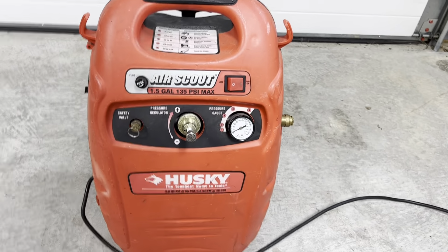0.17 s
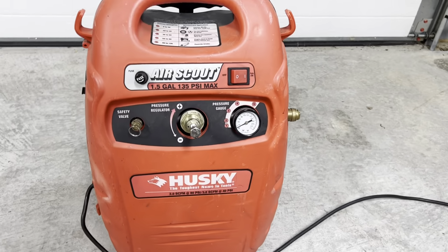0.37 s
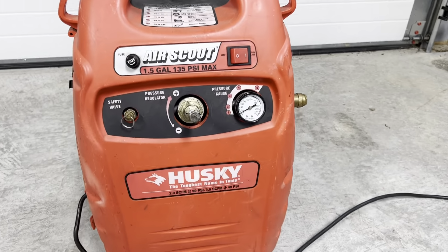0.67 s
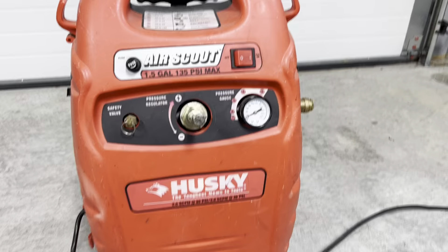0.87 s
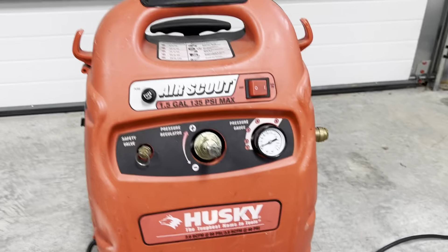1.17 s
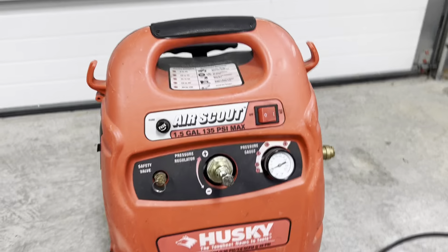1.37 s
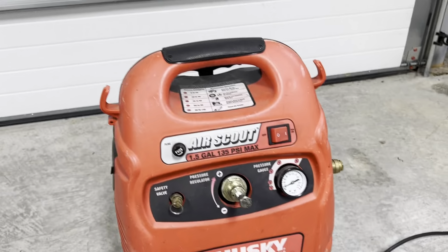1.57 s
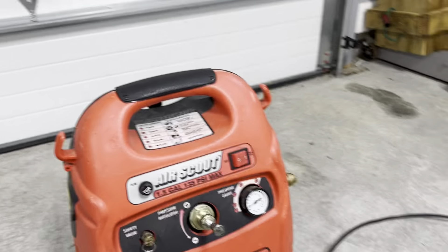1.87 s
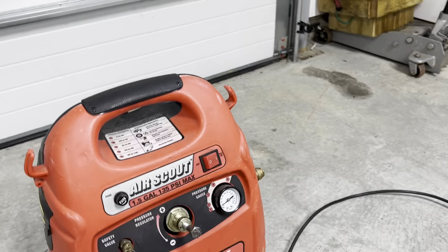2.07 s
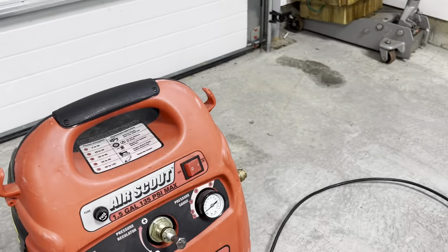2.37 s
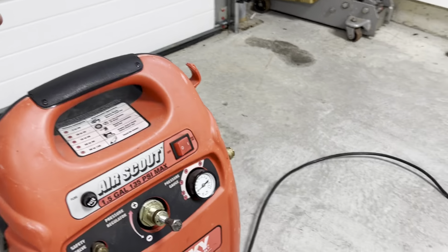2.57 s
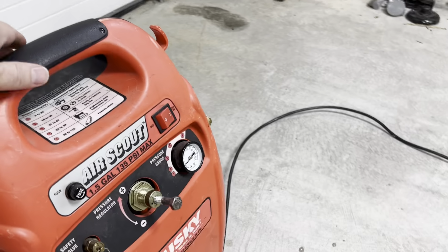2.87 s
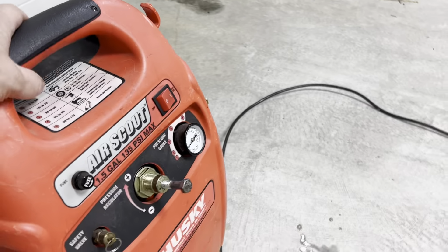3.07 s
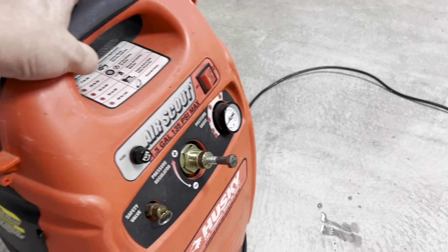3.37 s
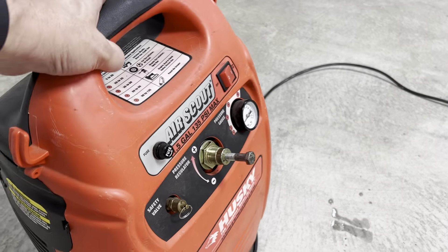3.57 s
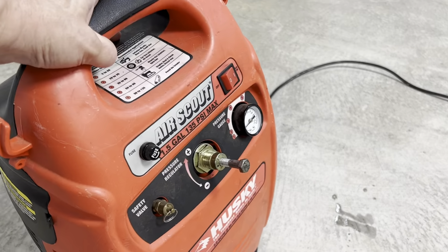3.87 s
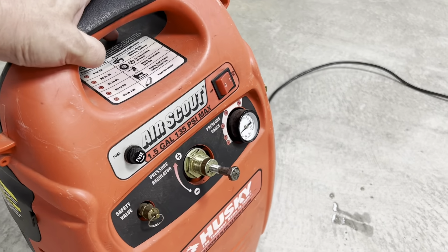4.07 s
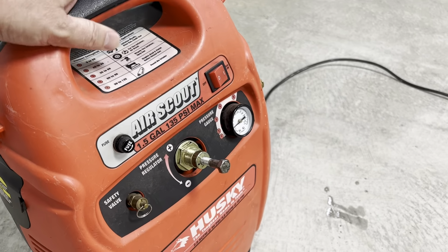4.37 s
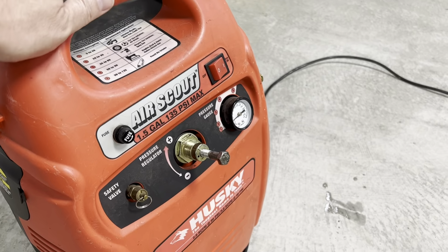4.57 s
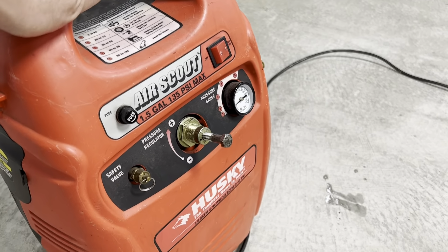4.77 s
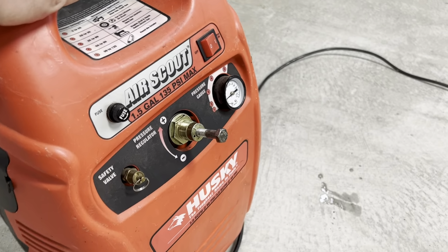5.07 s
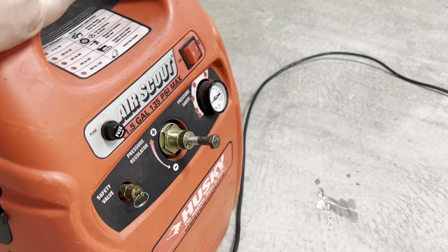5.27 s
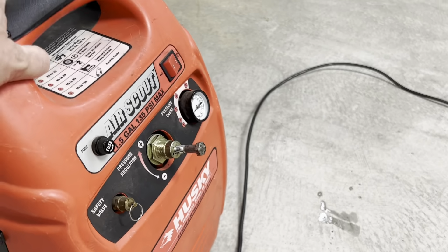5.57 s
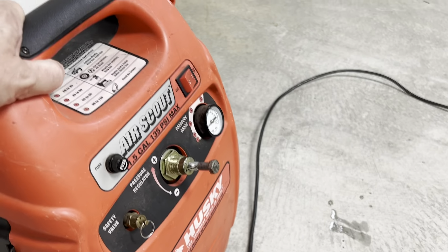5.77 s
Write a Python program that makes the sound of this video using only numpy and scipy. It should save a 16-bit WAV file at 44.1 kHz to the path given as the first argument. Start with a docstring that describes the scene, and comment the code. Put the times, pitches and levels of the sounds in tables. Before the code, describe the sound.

A small piston air compressor runs steadily in a garage, a rapid hammering drone with rattle and hiss, slowly dropping in pitch.

```python
"""A small piston air compressor fills its tank in a garage; the crank slows as the pressure climbs.
Piston and valves sound as sines at multiples of the crank rate, lifted where they cross body resonances.
Motor and gear whine are further sines; rattle and hiss are shaped noise pulsed by the valve knock.
A mains hum holds its pitch. A hand-held stereo microphone moves from the front round to the side."""
import sys
import numpy as np
from scipy import signal
from scipy.io import wavfile
from scipy.ndimage import uniform_filter1d

SR = 44100
rng = np.random.default_rng(int(sys.argv[2]) if len(sys.argv) > 2 else 0)


def put_to_file(sound):
    """Save the sound as 16-bit audio at rate SR, in the file named by the first command-line argument."""
    columns = np.atleast_2d(sound).T  # one column per channel
    safe = np.clip(columns, -1, 1)
    whole_steps = np.round(safe * 32767)
    wavfile.write(sys.argv[1], SR, whole_steps.astype(np.int16))


N = 261513
T = np.arange(N) / SR
SLOW_T = T[::256]  # time grid of the slow controls
EDGE_HZ = 15720  # upper band limit

# Crank speed. Each row: time in seconds, crank turns per second.
CRANK = [(0.0, 37.34), (0.49, 37.172), (0.99, 36.8), (1.48, 36.39), (1.98, 35.891), (2.47, 35.52),
         (2.96, 35.173), (3.46, 34.784), (3.95, 34.493), (4.45, 34.184), (4.94, 33.918), (5.44, 33.772),
         (5.93, 33.496)]
# Microphone path. Each row: time in seconds, place (0 in front, 1 above the corner, 2 at the side).
PLACE = [(0, 0.17), (.7, 0.0065), (1.2, 0.26), (1.6, 0.56), (1.9, 0.67), (2.8, 1.13), (3.2, 1.23),
         (4.4, 1.25), (4.9, 1.87), (5.93, 1.9)]
# Tank and housing resonances. Each row: centre in Hz, width in Hz, lift in dB (the rattle takes a share).
BODY = [(184, 5, 3), (265, 5, 14), (285, 5, 13), (347, 12, 22), (413, 10, 10), (439, 6, 16), (494, 19, 11),
        (556, 6, 5), (620, 39, 13), (692, 23, 19), (759, 6, 20), (851, 20, 17), (926, 11, 21),
        (948, 18, 22), (1021, 18, 21), (1090, 6, 11), (1342, 21, 9), (1362, 6, 12), (1415, 8, 11),
        (1455, 6, 9), (1494, 21, 9), (1535, 29, 9), (1596, 6, 11), (1672, 9, 21)]
# Standing waves in the garage, lifting or sinking single tones as the microphone moves.
# Each row: multiple of the crank rate, time in seconds, half length in seconds, lift in dB.
STANDING = [(3.5, 2.0, 0.8, -9), (4.5, 0.8, 0.2, 5), (4.5, 4.8, 0.4, 4), (5, 0.8, 0.3, 3), (6, 3.2, 0.2, 9),
            (6, 4.4, 0.35, -9), (7, 0.8, 0.35, 5), (7, 1.9, 0.55, -5), (7, 3.4, 0.8, 5),
            (7.5, 2.0, 0.8, -14), (8, 0.8, 0.8, 3), (8, 2.7, 0.3, 5), (8, 4.3, 0.4, 9), (9, 0.3, 0.3, 4),
            (9, 2.5, 0.35, 9), (10, 2.8, 0.25, 4), (12, 0.3, 0.3, -5), (15, 1.7, 0.45, -6),
            (15, 3.7, 0.3, 4), (15, 4.6, 0.35, -9), (17, 4.3, 0.3, 4), (18, 0.9, 0.35, 5),
            (18, 3.9, 0.2, -9), (18, 4.8, 0.3, 3), (21, 0.7, 0.9, 8), (23, 0.5, 0.7, 3), (34, 4.8, 0.9, 5),
            (20, 1.5, 0.3, -6), (20, 2.1, 0.3, 5), (22, 1.1, 0.45, 8), (22, 1.9, 0.55, 14),
            (22, 3.6, 0.5, 6), (23, 2.1, 0.3, -12), (26, 4.2, 0.65, -12), (29, 0.9, 1.2, -5),
            (36, 5.2, 0.4, -8), (37, 5.2, 0.4, -8), (39, 5.2, 0.3, -8), (42, 2.5, 0.5, -6),
            (42, 3.9, 0.3, -9), (43, 4.3, 0.5, 7), (45, 3.9, 0.3, 7), (24, 1.1, 0.35, 9),
            (25, 2.3, 0.3, -9), (26, 2.3, 0.4, 5), (27, 4.7, 0.3, -5), (29, 2.8, 0.4, 2),
            (28, 1.3, 0.2, -5), (28, 2.3, 0.3, -9), (28, 3.3, 0.8, -14), (28, 4.2, 0.2, -5),
            (29, 3.6, 0.2, -14), (29, 4.8, 0.55, 5), (30, 1.9, 0.2, 14), (37, 1.5, 0.55, -5),
            (37, 2.4, 0.2, 9), (38, 2.4, 0.8, -9), (39, 0.9, 0.35, -14), (39, 3.2, 0.35, -9),
            (39, 4.1, 0.2, 9), (40, 0.7, 0.35, -5), (40, 1.7, 0.2, 9), (40, 5.2, 0.35, -14),
            (41, 1.6, 0.4, 3), (45, 2.6, 0.2, 9), (54.0, 2.4, 0.35, -14), (54, 4.8, 0.2, 9),
            (54.0, 5.3, 0.3, 5), (57.38, 0.2, 0.2, -14), (57.38, 0.6, 0.3, 5), (57.38, 2.1, 0.4, -9),
            (57.38, 2.8, 0.2, 9), (57.38, 4.2, 0.7, -20)]

# Mains hum of the motor windings: level in dB rms in front, above, at the side.
HUM_HZ = 120
HUM_DB = (-37, -42.5, -45)

# Fan and valve hiss, common to both ports. Each row: frequency in Hz, base level in dB per Hz.
HISS = [(1500, -91.5), (2200, -73), (2450, -76.5), (2700, -74.5), (3300, -78), (4500, -75.5), (6000, -81),
        (7500, -78), (9000, -82.5), (9600, -112), (10600, -112), (11000, -85.5), (13000, -80),
        (15700, -87.5)]
# Hiss of opposite sign in the two ports. Each row: frequency in Hz, base level in dB per Hz.
HISS_WIDE = [(1500, -90), (2200, -70.5), (2450, -87), (2700, -75.5), (3700, -77), (4300, -77.5),
             (7000, -84), (9000, -81.5), (11000, -84.5), (12200, -79.5), (12600, -108), (14300, -108),
             (14600, -95), (15700, -92)]
# Brush noise humps. Each row: multiple of the motor rate, width in Hz, lift in dB.
BRUSHES = [(32.14, 540, 4), (64.7, 420, 1.5), (94.8, 420, 6)]
# Small metal parts ringing in the hiss. Each row: centre in Hz, width in Hz, full lift in dB.
PARTS = [(1998, 9, 15.5), (2210, 29, 4), (2650, 34, 8), (2970, 18, 9), (3203, 34, 9), (4930, 51, 8),
         (5320, 60, 3), (5780, 62, 3)]
# A single swell of the treble: time in seconds, half length in seconds, centre in Hz, width in Hz, lift in dB.
SWISH = (1.82, 0.14, 5600, 1600, 4)

# Rattle common to both ports. Each row: frequency in Hz, base level in dB per Hz.
RATTLE = [(20, -78), (50, -57), (100, -61), (140, -59), (160, -48.5), (190, -41), (290, -59), (350, -55.5),
          (500, -57.5), (750, -56.5), (900, -62), (1020, -56.5), (1180, -65.5), (1370, -59.5), (1700, -60),
          (1950, -69), (2400, -117.5)]
# Rattle of opposite sign in the two ports. Each row: frequency in Hz, base level in dB per Hz.
RATTLE_WIDE = [(20, -95), (100, -75), (170, -97), (350, -57), (800, -58), (900, -58), (1030, -58.5),
               (1180, -61), (1370, -52), (1450, -62), (1650, -53), (1900, -64), (2400, -87)]
# Brief panel buzzes. Each row: time in seconds, half length in seconds, centre in Hz, width in Hz, lift in dB.
BUZZES = [(2.5, 0.11, 1590, 140, 6), (2.71, .04, 1590, 100, 10), (3.42, .05, 1520, 80, 2),
          (3.62, 0.028, 1530, 100, 11), (3.72, 0.023, 1510, 140, 14), (3.872, 0.041, 1520, 140, 9)]

# Noise gained in front of the machine. Each row: frequency in Hz, lift in dB.
FRONT = [(60, 5), (130, 6.5), (350, 5.5), (600, 2), (950, 6.5), (1500, 6.5), (2500, 2), (4000, 3),
         (8000, 4), (12000, 3.5)]
# Part of the noise difference that is the common noise turned a quarter cycle.
# Each row: frequency in Hz, amplitude share (0 to 1).
QUADRATURE = [(200, 0.2), (700, 0.8), (1500, 0), (3000, 0.2), (6000, .35), (9000, 1), (12000, .7)]
# Left and right balance of the noise. Each row: frequency in Hz, left minus right in dB.
LEAN = [(60, -0.5), (130, -4), (290, 7), (640, 1.5), (1410, -1), (3100, 3.5), (6820, 1.5), (15000, -.5)]
# Port difference of the tones. Each row: frequency in Hz, level against the common part in dB.
TONE_WIDE = [(60, -55), (130, -26.5), (290, -11.5), (640, -13.5), (1410, -10), (3100, -12), (6820, -7),
             (15000, 0)]
TONE_LEAN_DB = -1.1  # left minus right

# Gear mesh whine and its side tones: multiples of the crank rate.
GEAR_MULTIPLES = [103.5, 105, 106, 107, 108, 109, 110, 112.5, 211.5]
# Each row: level in dB rms in front, above, at the side, before the lifts of body and room.
GEAR_DB = [(-52.5, -60, -63), (-69, -55, -51), (-61, -65, -76), (-63, -70, -65), (-53.5, -62, -60),
           (-51, -79, -64), (-55, -69, -61), (-52, -55, -61), (-49, -55, -68)]
MOTOR_TURNS = 27 / 8  # motor turns per crank turn
# Motor tones. Each row: multiple of the motor rate, then level in dB rms in front, above, at the side,
# before the lifts of body and room.
WHINE = [(4, -55, -52, -51), (15, -68, -58, -63), (16, -49, -56, -56), (17, -51, -54, -68)]

# Blows within each turn, bass to treble: air thump, valve closing, valve knock, its upper ring.
# Each row: highest multiple, crank angle in turns, start of its swing in cycles, base echo smear in cycles.
BLOWS = [(9, 0, .05, .01), (21, .9, .55, .09), (30, .3, .9, .05), (99, .285, .62, .13)]
# The same for the half multiples: crank angle in turns, start of the swing in cycles.
ROCKING = (-.45, .27)
KNOCK_TURN = BLOWS[2][1]  # crank angle of the valve knock

# Valve blow spectrum. Each row: frequency in Hz, then level in dB rms in front, above, at the side,
# before the lifts of single multiples, body and room.
VALVES = [(299, -45.5, -61, -47.5), (416, -43, -45.5, -45), (482, -59, -46, -50.5), (611, -43, -49, -48.5),
          (680, -66.5, -57.5, -48), (810, -62, -59, -58.5), (958, -45.5, -57.5, -62.5),
          (1156, -54.5, -57, -61), (1350, -48.5, -53, -49.5), (1550, -47.5, -55.5, -64),
          (1690, -79, -66, -60)]
FIRST_UPPER, LAST_UPPER = 9, 46  # multiples made by the valves
# Lift by the shape of the blow. Each entry: multiple, lift against its neighbours in dB.
ODD_MULTIPLES = {13: -10, 15: 5, 16: -5, 21: -8, 22: -3, 26: 2, 29: 3, 30: -4, 31: -4, 32: 4, 37: 3, 46: -7}
# Knocks stronger or weaker than usual. Each row: time in seconds, strength in dB on the scale of USUAL_KNOCK_DB.
HARD_KNOCKS = [(0.167, -9.5), (0.328, -11.5), (0.488, -11.5), (0.569, -9), (0.596, -10), (0.623, -9),
               (0.732, -12), (0.786, -11), (0.92, -15), (0.947, -8), (0.975, -10), (1.002, -8),
               (1.029, -9.5), (1.056, -8), (1.165, -10.5), (1.549, -8.5), (1.687, -7), (1.715, -7)]
USUAL_KNOCK_DB, KNOCK_SPREAD_DB = -11, 0.9
KNOCK_PEAK_S, KNOCK_HALF_S = 0.0044, 0.007  # lag of the peak, half length

# Piston multiples of the crank rate; half multiples arise as the machine rocks every second turn.
LOW_MULTIPLES = [1, 2, 3, 3.5, 4, 4.5, 5, 5.5, 6, 6.5, 7, 7.5, 8, 22.5]
# Each row: level in dB rms in front, above, at the side, before the lifts of body and room.
LOW_DB = [(-46.5, -42.5, -41.5), (-32.5, -34, -33), (-39, -36, -33), (-38, -52, -71), (-23.5, -36, -35),
          (-33.5, -31.5, -31.5), (-27.5, -24, -26), (-37, -38.5, -38), (-39.5, -38, -63), (-88, -41, -36),
          (-43.5, -40.5, -37), (-47, -47, -69), (-46, -56, -44), (-54, -49, -59)]


def gain_of(db):
    """Amplitude ratio: twenty decibels make a factor of ten."""
    return 10 ** (np.asarray(db) / 20)


def read(points, hz):
    """Spectral interpolation along a logarithmic frequency axis."""
    f, value = np.transpose(points)
    return np.interp(np.log(hz + 1), np.log(f + 1), value)


def curve(rows, t):
    """Linear interpolation of a quantity given at a few moments."""
    return np.interp(t, *np.transpose(rows))


def crank_rate(t):
    """Shaft speed in turns per second, falling under the rising load."""
    return curve(CRANK, t)


def crank_turns():
    """Shaft angle in turns: the time integral of the crank rate."""
    return np.cumsum(crank_rate(T)) / SR


def at_place(front, above, side, t):
    """Directivity: three values blend as the microphone moves from place to place."""
    place = np.clip(curve(PLACE, t), 0, 2)
    in_front = np.maximum(1 - place, 0)
    at_side = np.maximum(place - 1, 0)
    return front * in_front + above * (1 - abs(place - 1)) + side * at_side


def humps_db(hz, peaks):
    """Resonance: each peak adds a bell-shaped power response to a flat one."""
    power = 1
    for centre_hz, width_hz, lift_db in peaks:
        power = power + gain_of(2 * lift_db) / (1 + (2 * (hz - centre_hz) / width_hz) ** 2)
    return 10 * np.log10(power)


def standing_db(multiple, t):
    """Standing waves: single tones rise or sink for a while."""
    lift_db = 0
    for k, s, half_s, db in STANDING:
        chosen = abs(multiple[:, None] - k) < .1
        lift_db = lift_db + chosen * db * np.exp(-((t - s) / half_s) ** 2)
    return lift_db


def swell_db(hz, t, s, half_s, centre_hz, width_hz, db):
    """Transient resonance: a lift confined to one moment and one pitch region."""
    return db * np.exp(-((t - s) / half_s) ** 4 - (2 * (hz - centre_hz) / width_hz) ** 2)


def drift(count, top_hz):
    """Random fluctuation of rms 1: slow sines at chance rates and phases add up."""
    hz = np.geomspace(.15, top_hz, 12)[:, None, None]
    rate = hz * rng.uniform(0.808, 1.2, (count, 1))
    waves = np.sin(2 * np.pi * (rate * SLOW_T + rng.random((12, count, 1))))
    return waves.sum(0) / np.sqrt(6)


def knocks(depth, decay_turns, uneven_db):
    """Periodic excitation: a gain, near rms 1, jumps at each uneven valve knock and dies away."""
    turns = crank_turns() + 1 - KNOCK_TURN + 0.12
    strength = gain_of(uneven_db * rng.standard_normal(300))[turns.astype(int)]
    gain = 1 + depth * strength * np.exp(-(turns % 1) / decay_turns)
    gain = uniform_filter1d(gain, 60)  # soften the jump
    return gain / np.sqrt(uniform_filter1d(gain ** 2, size=SR // 4))


def knock_force():
    """Impact strength: a gain that differs from turn to turn, with marked single knocks."""
    turns = crank_turns() + .5 - KNOCK_TURN
    chance = rng.standard_normal(300)[turns.astype(int)]
    force_db = KNOCK_SPREAD_DB * uniform_filter1d(chance, size=300)
    for s, db in HARD_KNOCKS:
        bump = np.exp(-((T - s - KNOCK_PEAK_S) / KNOCK_HALF_S) ** 2)
        force_db = force_db + (db - USUAL_KNOCK_DB) * bump
    return gain_of(force_db)


def gain_above(x, edge_hz, gain):
    """Band splitting: the gain acts only on the part above the edge."""
    low = signal.oaconvolve(x, signal.firwin(801, edge_hz, fs=SR)[None], "same")
    return low + (x - low) * gain


def noise(common, wide, lift_db, patchy_db):
    """Filtered noise: random short-time spectra, summed and differenced into two ports."""
    hz = np.fft.rfftfreq(2048, 1 / SR)[:, None]
    frames = N // 512 + 5
    t = np.arange(frames) * 512 / SR
    a, b, c, d, patches = rng.standard_normal((5, len(hz), frames))
    # smooth over pitch and time, then restore the spread
    patches = uniform_filter1d(uniform_filter1d(patches, 12, 0), 8, 1) * np.sqrt(96)
    front = 1 - np.clip(curve(PLACE, t), 0, 1)
    shape = gain_of(read(FRONT, hz) * front + lift_db(hz, t) + patchy_db * patches)
    shared, separate = a + 1j * b, c + 1j * d
    turned = np.clip(read(QUADRATURE, hz), 0, 1)
    mid = gain_of(read(common, hz)) * shared
    side = gain_of(read(wide, hz)) * (turned * 1j * shared + np.sqrt(1 - turned ** 2) * separate)
    lean = gain_of(read(LEAN, hz) / 2)
    z = np.array([(mid + side) * lean, (mid - side) / lean]) * shape * np.sqrt(SR / 2048)
    return signal.istft(z, nperseg=2048, noverlap=1536)[1][:, :N]


def tones(multiple, place_db, start_turns, waver_db, waver_turns):
    """Harmonic synthesis: sines locked to the crank rise as they cross the body resonances."""
    t, count = SLOW_T, len(multiple)
    hz = multiple[:, None] * crank_rate(t)
    unrest = np.minimum(hz / 500, 1)  # the lowest multiples are the steadiest
    level_db = at_place(*place_db(hz), t) + humps_db(hz, BODY) + standing_db(multiple, t)
    level_db = level_db + waver_db * unrest * drift(count, 3.)
    phase_turns = start_turns + waver_turns * unrest * drift(count, 3.)
    common = gain_of(level_db) * np.exp(2j * np.pi * phase_turns)
    # the port difference keeps about a quarter cycle from the common part
    wide_turns = 0.26 + 0.1 * (rng.random((count, 1)) - .5) + 0.12 * drift(count, 0.96)
    wide = common * gain_of(read(TONE_WIDE, hz)) * np.exp(2j * np.pi * wide_turns)
    half_t, turns = T[::2], crank_turns()[::2]  # built at half rate
    out = np.zeros((2, len(half_t)))
    for k in range(count):
        spin = np.exp(2j * np.pi * multiple[k] * turns)
        for port, sign in enumerate((1, -1)):
            out[port] += (spin * np.interp(half_t, t, common[k] + sign * wide[k])).real
    out = signal.resample_poly(out, 2, 1, axis=1)[:, :N]
    return np.sqrt(2) * out * gain_of([[TONE_LEAN_DB / 2], [-TONE_LEAN_DB / 2]])


def stroke(multiple, place_db):
    """Phase alignment: groups of multiples line up at their crank angles into a thump and a knock."""
    highest, angle, start, spread = np.transpose(BLOWS)
    group = np.searchsorted(highest, multiple)
    half = multiple % 1 > 0
    whole_cycles = start[group] - multiple * angle[group]
    cycles = np.where(half, ROCKING[1] - multiple * ROCKING[0], whole_cycles)
    cycles = cycles - .25 * (multiple == 5)  # on the main tank resonance the swing lags a quarter cycle
    # the swing of multiples 4.5 and 5 comes earlier as the microphone nears the side
    early_pair = ((multiple == 4.5) | (multiple == 5))[:, None]
    advance = early_pair * at_place(0, .07, .14, SLOW_T)
    scatter = spread[group] * rng.standard_normal(len(multiple))
    smear = at_place(.7, 1.6, 2.2, SLOW_T)  # more echo at the side
    start_turns = cycles[:, None] + advance + scatter[:, None] * smear
    return tones(multiple, place_db, start_turns, waver_db=.8 + 1.5 * half[:, None], waver_turns=.04)


def hum():
    """Magnetic hum: the windings sound at twice the mains rate, whatever the crank speed."""
    level = np.sqrt(2) * gain_of(at_place(*HUM_DB, T))
    return level * np.sin(2 * np.pi * HUM_HZ * T) * np.ones((2, 1))


def hiss():
    """Turbulence noise: fixed rings of small parts and brush humps that fall with the motor rate."""
    def lift_db(hz, t):
        """Resonance lifts over the plain hiss."""
        motor_rate = MOTOR_TURNS * crank_rate(t)
        brushes = [(k * motor_rate, width_hz, db) for k, width_hz, db in BRUSHES]
        parts_db = humps_db(hz, PARTS) * at_place(0.78, 0.82, 0.78, t)  # share of the full lift
        return humps_db(hz, brushes) + parts_db + swell_db(hz, t, *SWISH)
    # the air stream is not quite even
    flutter = gain_of(0.35 * np.interp(T, SLOW_T, drift(1, 9.)[0]))
    air = noise(HISS, HISS_WIDE, lift_db, patchy_db=1.0)
    return air * knocks(depth=0.092, decay_turns=0.46, uneven_db=8.0) * flutter


def rattle():
    """Forced vibration: panel and air-pulse noise, faintly body-coloured, its upper part shaken by knocks."""
    def lift_db(hz, t):
        """A share of the body lift, an overall cut and the brief buzzes."""
        return 0.39 * humps_db(hz, BODY) - 6.0 + sum(swell_db(hz, t, *row) for row in BUZZES)
    panels = noise(RATTLE, RATTLE_WIDE, lift_db, patchy_db=2.0)
    depth = at_place(0.73, 0.43, 0.23, T)
    return gain_above(panels, 700, knocks(depth, decay_turns=0.15, uneven_db=1.5))


def gears():
    """Tooth meshing: a cluster of thin tones at high multiples of the crank rate."""
    levels = np.transpose(GEAR_DB)[:, :, None]
    start_turns = rng.random((len(GEAR_DB), 1))
    return tones(np.array(GEAR_MULTIPLES), lambda hz: levels, start_turns, waver_db=2.5, waver_turns=.15)


def motor():
    """Rotational tones: thin sines at multiples of the motor shaft rate."""
    rows = np.transpose(WHINE)
    start_turns = rng.random((len(WHINE), 1))
    return tones(MOTOR_TURNS * rows[0], lambda hz: rows[1:, :, None], start_turns, waver_db=2.5, waver_turns=.15)


def valves():
    """Impact spectrum: each upper multiple takes its level from the blow; the knock sits above 750 Hz."""
    rows = np.array(VALVES)
    multiple = np.arange(FIRST_UPPER, LAST_UPPER + 1)
    odd_db = np.array([[ODD_MULTIPLES.get(k, 0)] for k in multiple])

    def place_db(hz):
        """Levels in front, above and at the side."""
        return [read(rows[:, [0, place]], hz) + odd_db for place in (1, 2, 3)]
    return gain_above(stroke(multiple, place_db), 750, knock_force())


def piston():
    """Periodic pulsation: the air thump and the rocking give low whole and half multiples."""
    levels = np.transpose(LOW_DB)[:, :, None]
    return stroke(np.array(LOW_MULTIPLES), lambda hz: levels)


def scene():
    """Superposition: all parts of the running machine add up."""
    return hum() + hiss() + rattle() + gears() + motor() + valves() + piston()


def record(dry):
    """Band limitation: a steep low-pass filter ends the spectrum."""
    low_pass = signal.firwin(1501, EDGE_HZ, window=("kaiser", 9), fs=SR)
    return signal.oaconvolve(dry, low_pass[None], "same")


dry = scene()
out = record(dry)
put_to_file(out)
```